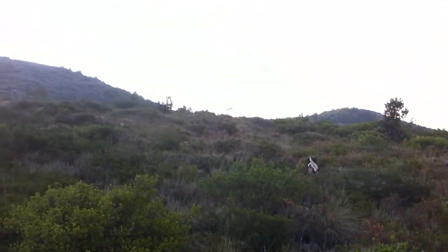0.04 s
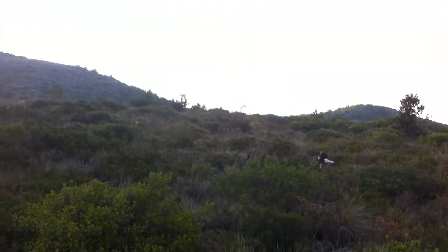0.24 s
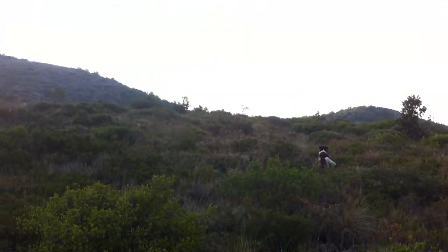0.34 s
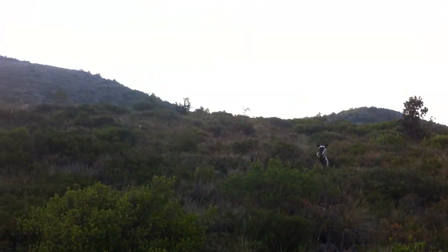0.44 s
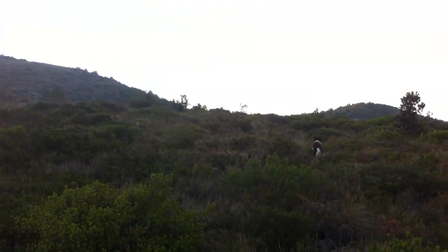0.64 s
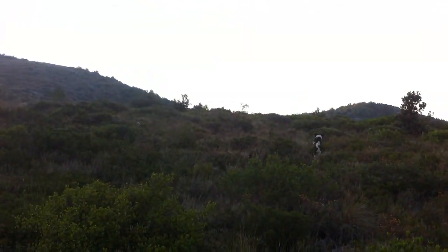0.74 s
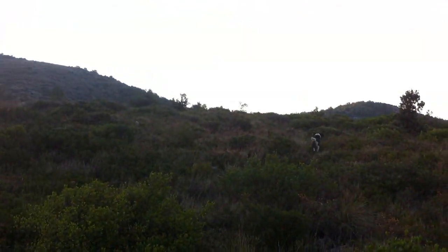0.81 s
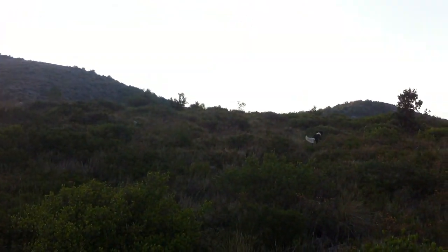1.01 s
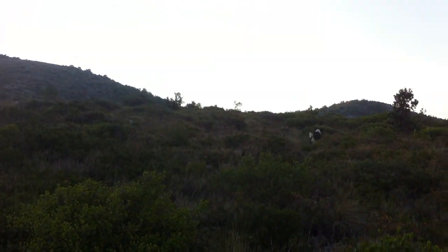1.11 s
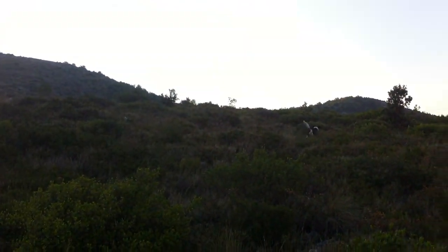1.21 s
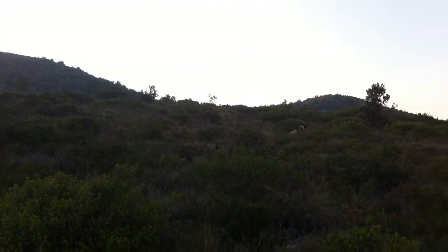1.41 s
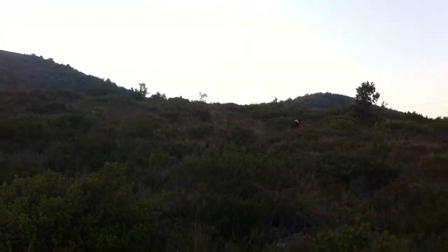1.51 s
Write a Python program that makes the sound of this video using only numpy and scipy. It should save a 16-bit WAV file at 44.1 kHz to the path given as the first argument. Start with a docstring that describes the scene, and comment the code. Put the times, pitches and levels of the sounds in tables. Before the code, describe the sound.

One very loud, close gunshot cracks at about 0.2 seconds, briefly overloading the microphone, its low boom and short hillside echo dying away by 0.6 seconds. A sharp ringing tick comes at 0.5 seconds, with fainter ones later. A bird gives one faint rising chirp just before the shot and three more between 0.8 and 1.1 seconds. Dry brush rustles softly and light wind bumps the microphone throughout.

```python
"""Gunshot on a scrubby hillside

One close shot: a bright crack that overloads the microphone, a darker muzzle blast with a low boom,
and a short wash scattered back by bushes and slope. A sharp ringing tick follows, then fainter ones.
A bird whistles four quick rising chirps and one faint raspy slur. Dry brush rustles and crackles,
light wind bumps the microphone, and air swells softly at the end."""
import sys
import numpy as np
from scipy import signal
from scipy.fft import rfft, irfft
from scipy.io import wavfile
from scipy.ndimage import uniform_filter1d

SR = 44100
rng = np.random.default_rng(int(sys.argv[2]) if len(sys.argv) > 2 else 0)


def wav_out(sig):
    """Save sig, one row per channel (or a flat mono array), as 16-bit PCM at SR to the path in sys.argv[1]."""
    wavfile.write(sys.argv[1], SR, np.round(np.clip(np.atleast_2d(sig).T, -1, 1) * 32767).astype(np.int16))


N = 68355
T = np.arange(N) / SR
SHOT_S = .2243
# leaf hiss spectrum: freq_hz, density_db
LEAF_SPECTRUM = [(240, -54), (400, -17), (683, -23), (860, -20), (942, -31.5), (2360, 0.5), (5820, -12),
                 (8670, 6.5), (15500, -17.5)]


def amp(db):
    """Decibels to gain."""
    return 10 ** (np.asarray(db) / 20)


def unit_rms(x):
    """Scale to rms 1."""
    return x / np.sqrt(np.mean(x ** 2) + 1e-20)


def log_interp(points, hz):
    """Interpolate (freq_hz, value) points on a log-frequency axis."""
    freq_hz, value = np.transpose(points)
    return np.interp(np.log(hz + 1), np.log(freq_hz + 1), value)


def envelope(points):
    """Gain over time from (time_s, level_db) points."""
    return amp(np.interp(T, *np.transpose(points)))


def noise(spectrum, grain_db=0):
    """Coloured noise of rms 1; grain_db makes single grains stand out."""
    white = rng.standard_normal(N) * amp(grain_db * np.minimum(rng.exponential(1, N), 4))
    gain = amp(log_interp(spectrum, np.fft.rfftfreq(N, 1 / SR)))
    return unit_rms(irfft(rfft(white) * gain, N))


def burst(start_s, rise_s, hold_s, t60_s):
    """Envelope: linear rise, exponential decay from hold_s after the start."""
    t = T - start_s
    return np.clip(t / rise_s, 0, 1) * np.exp(-np.log(1000) * np.maximum(t - hold_s, 0) / t60_s)


def resonate(x, hz, width_hz):
    """One resonance gliding along the curve hz."""
    carrier = np.exp(2j * np.pi * np.cumsum(hz) / SR)
    pole = np.exp(-np.pi * width_hz / SR)
    return 2 * (carrier * signal.lfilter([1 - pole], [1, -pole], x / carrier)).real


def bush_reverb(x, wet_db, t60_s):
    """Add a thin tail of reflections from the bushes."""
    t = T[:SR // 3]
    tail = rng.standard_normal(len(t)) * np.exp(-np.log(1000) * t / t60_s) * np.minimum(t / .004, 1)
    return x + amp(wet_db) * signal.fftconvolve(x, tail / np.linalg.norm(tail))[:N]


def wind(bump_width_s=.0046, overtone_db=-27.5):
    """Low flutter at the microphone; gusts bump it with short soft thuds."""
    # flutter strength: time_s, level_db
    flutter_levels = [(0, -62.5), (.5, -61), (.62, -72), (.73, -73), (.8, -69), (.91, -77), (.97, -60.5),
                      (1.08, -68), (1.27, -57.5), (1.35, -73.5), (1.38, -86), (1.48, -86.5), (1.55, -57)]
    # flutter spectrum: freq_hz, density_db
    flutter_spectrum = [(20, -24), (55, -16), (100, -1), (160, -3), (250, -13.5), (400, -28.5),
                        (1000, -55.5), (16000, -88.5)]
    # gust thuds: centre_s, level_db, pitch_hz
    bumps = [(.003, -34, 190), (0.031, -50, 143), (0.079, -49.5, 136), (0.16, -43, 136),
             (0.389, -40.5, 173), (.415, -45, 156), (0.441, -47, 185), (0.481, -47.5, 165),
             (.518, -52, 149), (.6, -58.5, 171), (.779, -59, 164), (.8, -57, 102), (.882, -60.5, 140),
             (0.946, -58, 130), (0.979, -46, 188.7), (1.071, -60, 143), (1.111, -53, 105),
             (1.183, -49, 115), (1.212, -48.5, 127.4), (1.242, -41, 137), (1.272, -42, 152),
             (1.279, -54.5, 290), (1.309, -50, 146), (1.342, -52, 129)]
    out = envelope(flutter_levels) * noise(flutter_spectrum)
    for (centre_s, db, hz), offset in zip(bumps, rng.random(len(bumps))):
        pulse = np.exp(-.5 * ((T - centre_s) / bump_width_s) ** 2)
        phase = 2 * np.pi * (hz * (T - centre_s) + offset)
        out += amp(db) * pulse * (np.sin(phase) + amp(overtone_db) * pulse * np.sin(2 * phase))
    return out


def brush():
    """Grainy rustle of dry brush and brief leaf swishes over a faint steady hiss of air."""
    # rustle strength: time_s, level_db
    rustle_levels = [(0, -59), (.2, -55), (.5, -66.5), (.58, -67), (.75, -73), (.9, -80.5), (1.0, -83),
                     (1.09, -75.5), (1.16, -74), (1.21, -83), (1.48, -84), (1.55, -73)]
    # rustle spectrum: freq_hz, density_db
    rustle_spectrum = [(240, -37.5), (400, -6.5), (595, -15.5), (673, 0), (834, -11), (928, -7.5),
                       (1790, 0.5), (4700, -11), (8800, 0), (15500, -17)]
    # leaf swishes: centre_s, level_db, width_s
    swishes = [(.615, -61.5, 0.011), (.646, -63.5, 0.0053), (.68, -71, 0.1), (1.04, -72, 0.036)]
    # air hiss spectrum: freq_hz, density_db
    air_spectrum = [(18, -50), (30, -19), (299, -6.5), (455, -7.5), (575, -3.5), (1050, -6.5), (1290, -7.5),
                    (2490, -10.5), (3230, -12), (15500, -15.5)]
    rustle = envelope(rustle_levels) * noise(rustle_spectrum, grain_db=3)
    swish_gain = sum(amp(db) * np.exp(-.5 * ((T - s) / width_s) ** 2) for s, db, width_s in swishes)
    leaves = swish_gain * noise(LEAF_SPECTRUM, grain_db=4.5)
    return rustle + leaves + amp(-72.5) * noise(air_spectrum)


def twigs(rate_per_s=22, t60_s=.01):
    """Faint random crackles of dry twigs."""
    hits = (rng.random(N) < rate_per_s / SR) * rng.uniform(.5, 1, N)
    decay = np.exp(-np.log(1000) * T[:SR // 20] / t60_s)
    return amp(-72) * np.convolve(hits, decay)[:N] * noise(LEAF_SPECTRUM)


def bird_chirps(length_s=.029, start_hz=1310, rise_hz_per_s=57000, waver_depth=.02):
    """Slightly unsteady whistles, each sliding quickly upward."""
    # chirps: start_s, level_db
    chirps = [(0.1389, -41.5), (0.817, -51.5), (0.994, -48.5), (1.1164, -48.5)]
    # envelope of one chirp: length_fraction, gain_db
    shape = [(0, -24), (.14, -8.5), (.28, -2), (.48, -15), (.69, -8), (.8, -22), (1, -22)]
    waver = 1 + waver_depth * unit_rms(uniform_filter1d(rng.standard_normal(N), size=120))
    out = np.zeros(N)
    for start_s, db in chirps:
        t = np.clip(T - start_s, 0, length_s)
        cycles = np.cumsum((start_hz + rise_hz_per_s * t) * waver) / SR
        gain = amp(db + np.interp(t / length_s, *np.transpose(shape))) * (t > 0) * (t < length_s)
        out += gain * np.sin(2 * np.pi * cycles)
    return out


def shot(lead_s=.0018, front_s=.0004, blast_delay_s=.0041):
    """Pressure front and bright crack; the darker muzzle blast and its low boom swell behind."""
    # crack spectrum: freq_hz, density_db
    crack_spectrum = [(30, -11), (90, -18.5), (200, -3.5), (500, 0), (1050, -12), (1600, 2), (3150, -6),
                      (3700, -9), (6000, -2), (8500, -7.5), (9700, -13), (12600, -9), (15500, -17.5)]
    # muzzle blast spectrum: freq_hz, density_db
    blast_spectrum = [(30, -40), (105, -29.5), (220, -6.5), (440, -11), (560, -5), (900, -6), (1350, -2),
                      (1850, -2), (2200, -5.5), (3150, -9.5), (3800, -18.5), (6900, -14.5), (12900, -22),
                      (15500, -40.5)]
    # boom spectrum: freq_hz, density_db
    boom_spectrum = [(20, -50.5), (95, -45), (145, -12.5), (190, 2), (275, 0.5), (380, -12), (550, -17.5),
                     (900, -35), (16000, -80.5)]
    # a weaker fizz runs just ahead of the crack
    lead = amp(-9.5) * np.clip((T - SHOT_S) / lead_s + 1, 0, 1) * (T < SHOT_S)
    front_age = np.maximum(T - SHOT_S, 0) / front_s
    front = (front_age > 0) * (1 - front_age) * np.exp(-front_age)
    crack = noise(crack_spectrum) * (lead + burst(SHOT_S, rise_s=.00036, hold_s=.0055, t60_s=.035))
    blast = noise(blast_spectrum) * burst(SHOT_S + blast_delay_s, rise_s=.01, hold_s=.026, t60_s=.07)
    boom = noise(boom_spectrum) * burst(SHOT_S, rise_s=.0029, hold_s=.019, t60_s=.2)
    return amp(-4) * front + amp(-9) * crack + amp(-15.5) * blast + amp(-23) * boom


def hillside():
    """The shot scattered by scrub, dying band by band, plus three echoes off the slope."""
    # reflected spectrum: freq_hz, density_db
    scrub_spectrum = [(30, -37), (60, -37), (115, -15.5), (170, -7), (280, -8.5), (380, -14.5), (650, -7.5),
                      (1300, -7.5), (1700, -6), (2700, -6.5), (5200, -16.5), (8700, -11.5), (12500, -17.5),
                      (15500, -24.5)]
    # scatter decay: centre_hz, t60_s
    band_decays = [(50, .25), (170, 0.34), (350, 0.4), (1000, 0.31), (2200, .42), (5000, .33), (9000, .38),
                   (15000, 0.18)]
    # slope echoes: start_s, level_db, hold_s
    echoes = [(0.298, -26, 0.0069), (0.389, -45, 0.03), (0.469, -57, 0.066)]
    scatter = rfft(noise(scrub_spectrum, grain_db=1))
    hz = np.fft.rfftfreq(N, 1 / SR)
    centres_hz, t60s_s = np.transpose(band_decays)
    wash = np.zeros(N)
    for band_weights, t60_s in zip(np.eye(len(centres_hz)), t60s_s):
        band = irfft(scatter * log_interp(np.c_[centres_hz, band_weights], hz), N)
        wash += amp(-23.5) * band * burst(SHOT_S, rise_s=.02, hold_s=.035, t60_s=t60_s)
    echo_gain = sum(amp(db) * burst(start_s, rise_s=.00394, hold_s=hold_s, t60_s=.058)
                    for start_s, db, hold_s in echoes)
    return wash + echo_gain * noise(scrub_spectrum, grain_db=2.5)


def ticks(snap_db=-6):
    """Dry snaps ringing a few quickly damped modes; smaller ones ring higher."""
    # ticks: start_s, level_db, pitch_ratio
    hits = [(0.5319, -26.5, 1.055), (.549, -46, 2.1), (1.102, -65, 3.2), (1.495, -58.5, 2.11)]
    # ringing modes at pitch_ratio 1: freq_hz, gain_db, t60_s
    modes = [(1270, -0.5, 0.011), (1770, -10.5, 0.0093), (2220, -1.5, 0.0072), (2680, -16, 0.006),
             (4891, -17, 0.0053), (438, -14.5, 0.018)]
    # opening snap spectrum: freq_hz, density_db
    snap_spectrum = [(30, -27), (400, -13), (850, -24), (1500, 1), (2500, 6), (4000, -17), (7300, -8.5),
                     (9500, -32), (16000, -45)]
    snap = noise(snap_spectrum)
    out = np.zeros(N)
    for start_s, db, pitch_ratio in hits:
        out += amp(db + snap_db) * burst(start_s, rise_s=.00026, hold_s=0, t60_s=.009) * snap
        for hz, mode_db, t60_s in modes:
            ring = np.sin(2 * np.pi * hz * pitch_ratio * (T - start_s))
            out += amp(db + mode_db) * burst(start_s, rise_s=.00048, hold_s=0, t60_s=t60_s) * ring
    return bush_reverb(out, wet_db=-15, t60_s=.1)


def bird_slur():
    """One faint raspy note: noise through a falling resonance."""
    # note contour: time_s, pitch_hz, level_db
    contour = [(1.015, 3200, -88), (1.03, 3400, -75.5), (1.058, 3310, -82), (1.07, 2200, -73),
               (1.097, 1710, -64), (1.112, 1380, -66.5), (1.135, 1400, -68.5), (1.165, 1150, -73),
               (1.19, 1000, -95)]
    time_s, pitch_hz, level_db = np.transpose(contour)
    rasp = rng.standard_normal(N)
    for _ in range(2):
        rasp = resonate(rasp, np.interp(T, time_s, pitch_hz), width_hz=760)
    return unit_rms(rasp) * amp(np.interp(T, time_s, level_db)) * (T > time_s[0]) * (T < time_s[-1])


def air_swell():
    """Soft, dull rush of air rising after the last tick."""
    # swell strength: time_s, level_db
    levels = [(0, -110), (1.47, -100), (1.5, -85.5), (1.55, -65.5)]
    # swell spectrum: freq_hz, density_db
    spectrum = [(30, -1), (120, 3.5), (350, -2), (900, -7), (1700, -10.5), (3500, -21.5), (16000, -38.5)]
    return envelope(levels) * noise(spectrum)


def scene():
    """All sources at one microphone."""
    background = wind() + brush() + twigs()
    bird = bush_reverb(bird_chirps() + bird_slur(), wet_db=-10, t60_s=.16)
    return (background + bird + shot() + hillside() + ticks() + air_swell())[None]


def record(dry):
    """Microphone overload soft-clips the crack; a low-pass limits the band."""
    ceiling, cutoff_hz = .66, 15900
    clipped = dry / (1 + (dry / ceiling) ** 6) ** (1 / 6)
    lowpass = signal.firwin(255, cutoff_hz, window=("kaiser", 8), fs=SR)
    return signal.oaconvolve(clipped, lowpass[None], "same")


dry = scene()
out = record(dry)
wav_out(out)
```